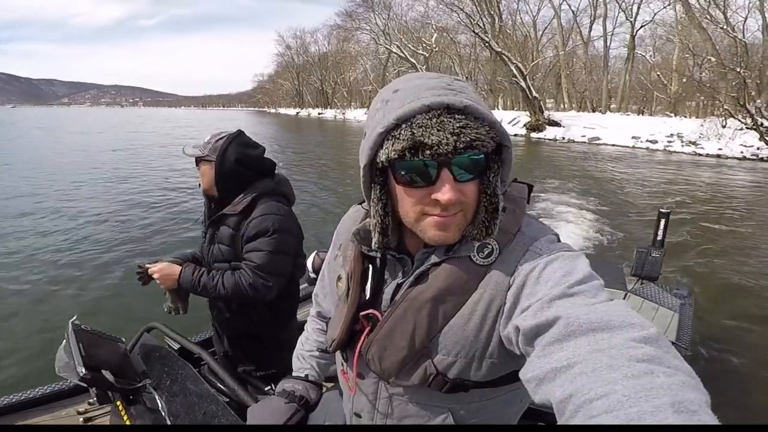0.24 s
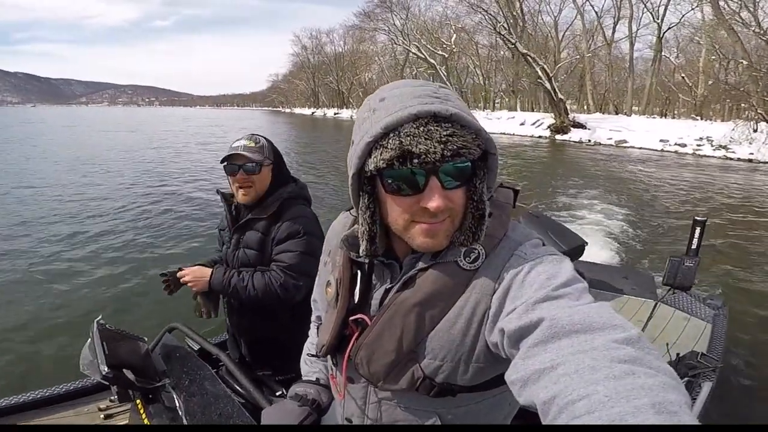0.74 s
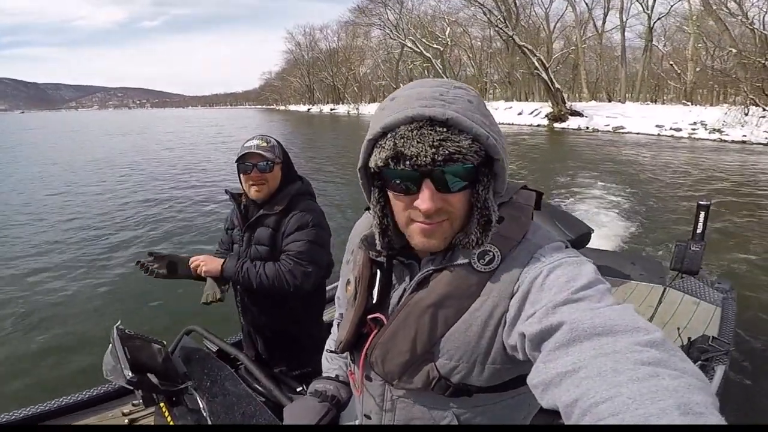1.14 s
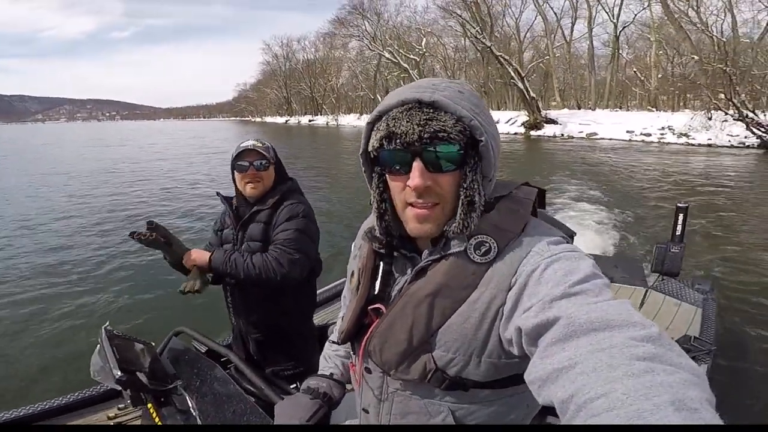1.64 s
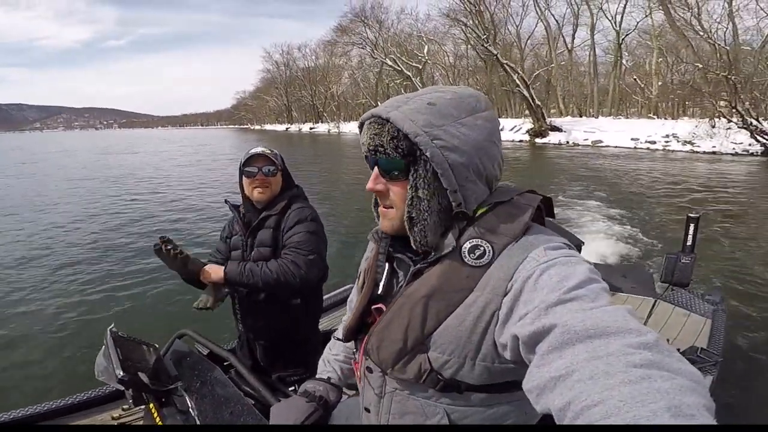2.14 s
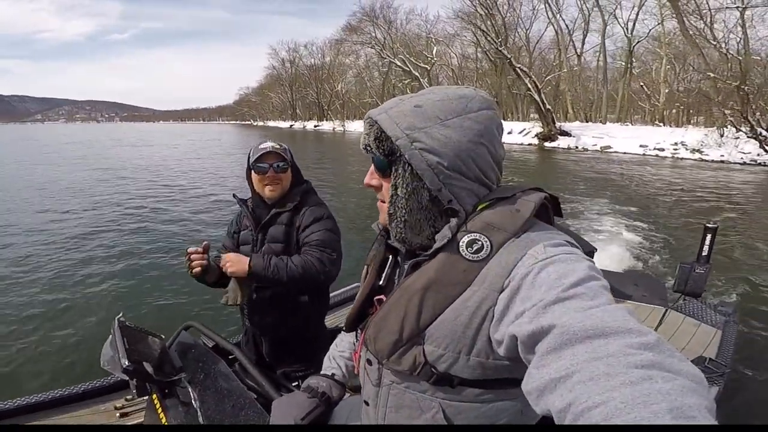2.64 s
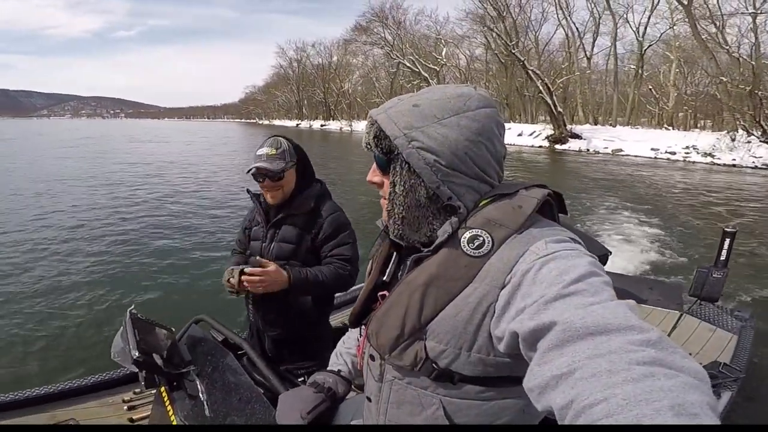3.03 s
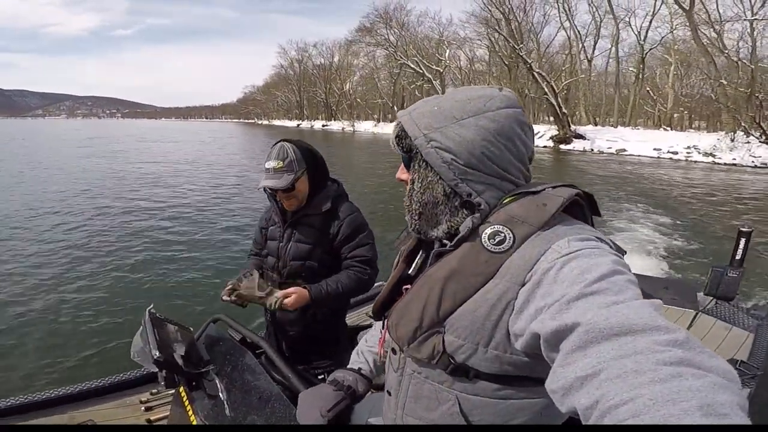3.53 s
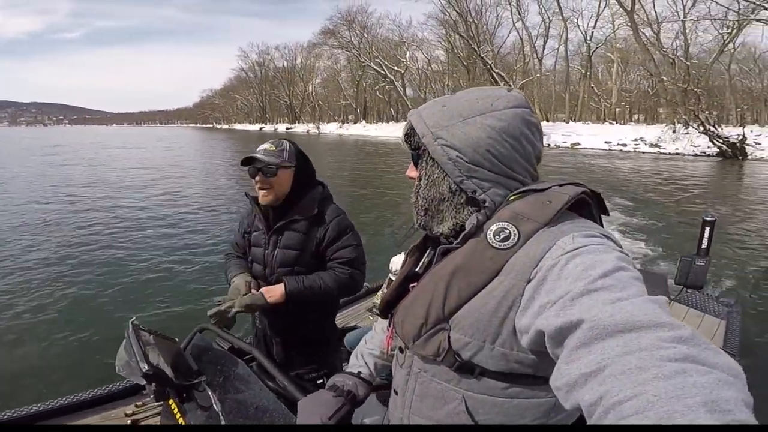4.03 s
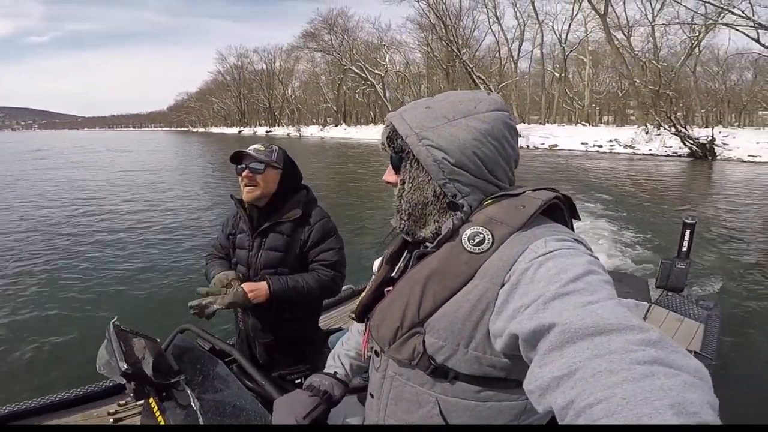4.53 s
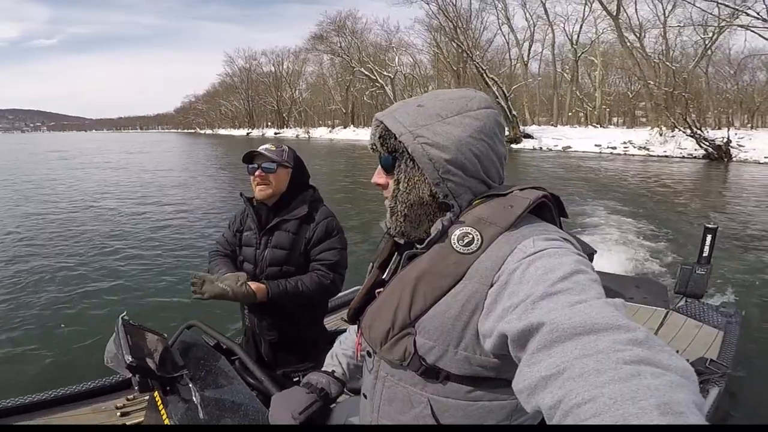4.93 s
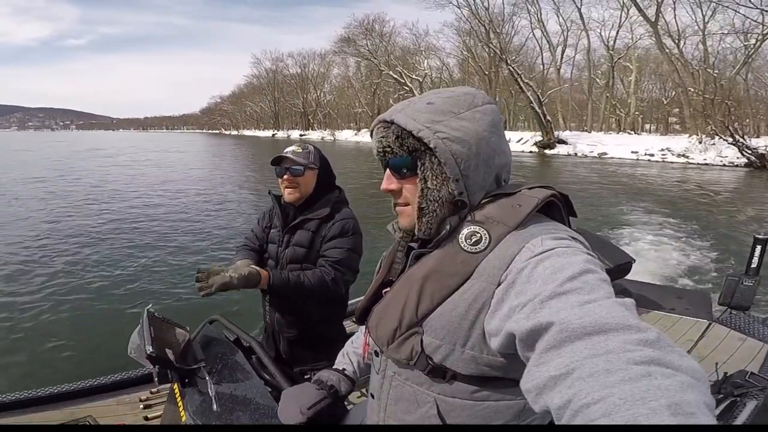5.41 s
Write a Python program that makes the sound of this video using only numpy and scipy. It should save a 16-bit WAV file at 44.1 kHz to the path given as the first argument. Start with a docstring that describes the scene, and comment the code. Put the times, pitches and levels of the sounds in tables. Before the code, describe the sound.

A motorboat cruises along a river, heard from the open deck. Its engine drones at a steady speed with an uneven low throb, over the rush of exhaust and wake and a light wind. A soft, deep bump comes about a second in. Later a faint metallic whine comes and goes, and near the end a jacket rustles briefly close to the microphone.

```python
"""On board an open jet boat cruising along a river, one microphone out in a light wind.
From the start the six-cylinder engine drones over the roar of exhaust and wake, pulling harder at
first; its firing note throbs as it beats with a boom a few hertz higher, and drive and panels whine
faintly. At 1.2 s comes one soft bump. From 2.2 s a gear sets one panel singing in stretches, and
from 5 s clothing rustles close to the microphone."""
import sys
import numpy as np
from scipy import signal
from scipy.fft import rfft, irfft, next_fast_len
from scipy.io import wavfile

SR = 44100
rng = np.random.default_rng(int(sys.argv[2]) if len(sys.argv) > 2 else 0)


def file_out(sig):
    """Save sig as 16-bit WAV at sys.argv[1]."""
    # one column per channel
    cols = np.atleast_2d(sig).T
    # limit, then scale
    lim = np.clip(cols, -1, 1)
    pcm = np.round(lim * 32767).astype(np.int16)
    wavfile.write(sys.argv[1], SR, pcm)


N = 250047
TIME = np.arange(N) / SR
CYLINDERS = 6


# engine speed under way: t/s, rate/(full engine cycles per s)
ENGINE_SPEED = [(0.0, 25.63), (0.36, 27.01), (0.52, 27.0), (0.64, 26.79), (0.8, 27.38), (0.98, 26.62),
                (1.12, 26.67), (1.35, 26.78), (1.5, 27.24), (1.69, 26.58), (1.87, 27.53), (2.03, 26.83),
                (2.27, 27.56), (2.44, 26.78), (2.56, 27.31), (2.75, 27.51), (2.88, 27.0), (3.02, 27.31),
                (3.15, 26.95), (3.3, 27.24), (3.62, 27.0), (3.87, 27.26), (4.13, 27.01), (4.42, 27.53),
                (4.68, 26.79), (4.82, 27.09), (4.95, 26.99), (5.14, 27.48), (5.31, 27.25), (5.67, 27.75)]
def crankshaft(first_chug_s):
    """Engine cycles counted from the first chug; everything that turns on board follows them."""
    turns = np.cumsum(in_time(ENGINE_SPEED)[0]) / SR
    return turns - np.interp(first_chug_s, TIME, turns)


# throbs of the drone, where firing note and boom fall into step: t/s, level/dB
THROBS = [(.03, -26.5), (.18, -30), (.35, -23.5), (.5, -24.5), (.67, -22.5), (.83, -23.5), (1.0, -23),
          (1.12, -24.5), (1.24, -20), (1.35, -26.5), (1.48, -23.5), (1.6, -19.5), (1.73, -25.5),
          (1.87, -22), (2.01, -21.5), (2.14, -21), (2.26, -22), (2.42, -23.5), (2.52, -21), (2.64, -21),
          (2.78, -21), (2.9, -24.5), (3.02, -21), (3.22, -27), (3.35, -24.5), (3.51, -24), (3.62, -24.5),
          (3.79, -21.5), (3.95, -25), (4.11, -26), (4.25, -21.5), (4.41, -29), (4.54, -28), (4.69, -24.5),
          (4.79, -25.5), (4.95, -28.5), (5.09, -26.5), (5.31, -29), (5.44, -40), (5.61, -26)]
# the boom's part in the drone, throbbing deepest at a half: t/s, share/(0-1)
BOOM_SHARE = [(0, .27), (.75, .2), (.9, .44), (1.05, .28), (1.3, .46), (1.55, .5), (1.8, .44), (2.08, .48),
              (2.2, .25), (2.33, .5), (2.58, .42), (2.72, .48), (3.1, .5), (3.3, .36), (3.7, .28),
              (3.9, .36), (4.05, .25), (4.2, .46), (4.9, .48), (5.67, .4)]
def firing_note(turns, boom_wander, flutter_db):
    """The firing note and a boom just above it drift in and out of step, throbbing as they meet."""
    share = in_time(BOOM_SHARE)[0]
    note = line(turns, order=CYLINDERS, start=0, wander=0, flutter_db=flutter_db)
    boom = line(CYLINDERS * turns + beats(), order=1, start=0, wander=boom_wander, flutter_db=flutter_db)
    return from_db(in_time(THROBS)[0]) * ((1 - share) * note + share * boom)


def beats():
    """Cycles the boom has gained on the firing note: one a throb."""
    return np.interp(TIME, np.array(THROBS)[:, 0], np.arange(len(THROBS)))


def surge(swing_db):
    """Gain that lifts and drops the chug with each throb of the firing note."""
    depth = 2 * in_time(BOOM_SHARE)[0]
    return from_db(swing_db * depth * np.cos(2 * np.pi * beats()))


# partials from unequal cylinders: f/cycle rate, base level at start/dB, base level at end/dB
ENGINE_ORDERS = [(1, -49, -43), (2, -45.5, -45.5), (3, -42, -41.5), (4, -34.5, -35), (5, -34.5, -34.5),
                 (7, -41.5, -36), (8, -41, -48.5), (9, -44, -52.5), (10, -41.5, -46), (11, -45, -37.5),
                 (12, -44.5, -44), (13, -35.5, -37), (14, -48.5, -46.5), (15, -56, -58), (16, -41, -43),
                 (18, -49, -48), (19, -47, -52.5), (21, -55, -53.5), (30, -57, -58.5), (33, -51, -65)]
# one overtone of the growl briefly stands out or sinks: f/cycle rate, mid t/s, half length/s, change/dB
SWELLS = [(11, .88, .2, 8), (11, 1.6, .1, 8), (11, 2.2, .1, 5), (11, 2.48, .05, 7), (11, 3.27, .06, 4),
          (11, 4.8, .1, 4), (13, .95, .13, -5), (13, 1.85, .05, -9), (13, 3.27, .06, -6),
          (13, 3.6, .08, -4), (13, 4.12, .06, -4), (13, 4.33, .04, 4), (13, 4.56, .1, -10),
          (13, 4.95, .08, -7), (13, 5.33, .04, -5), (12, .5, .28, 3), (18, .15, .12, 4), (18, .47, .07, 5),
          (18, 1.23, .17, 10), (18, 2.9, .08, 9), (18, 3.68, .25, 6), (18, 4.45, .25, 5)]
def engine(turns, spread, smear, wander_per_order, chug_flutter_db, growl_flutter_db, pull_db, pull_s):
    """Unequal cylinders chug once a cycle; the exhaust spreads the chug and smears its top to a growl."""
    out = np.zeros(N)
    for order, first_db, last_db in ENGINE_ORDERS:
        order = round(order)
        above_firing = order - CYLINDERS
        flutter_db = chug_flutter_db if above_firing < 0 else growl_flutter_db
        start = spread * above_firing ** 2 / 2 + smear * max(above_firing, 0) * rng.standard_normal()
        settling_db = np.linspace(first_db, last_db, N)
        # pulling harder at first lifts the overtones of the firing note
        lift_db = pull_db * np.exp(-TIME / pull_s) * (order % CYLINDERS == 0)
        swell_db = sum(db * np.exp(-((TIME - s) / half) ** 4) for k, s, half, db in SWELLS if k == order)
        partial = line(turns, order, start, wander_per_order * order, flutter_db)
        out += from_db(settling_db + lift_db + swell_db) * partial
    return out


def dip(at_s, half_s, change_db):
    """Gain that makes the drone dip briefly."""
    return from_db(change_db * np.exp(-((TIME - at_s) / half_s) ** 2))


# exhaust and hull roar as heard on board: f/Hz, relative level/dB
ROAR_SPECTRUM = [(30, -88), (70, -55.5), (120, -57.5), (180, -54.5), (225, -57.5), (260, -61), (315, -61.5),
                 (390, -60.5), (465, -60.5), (540, -68.5), (650, -69), (720, -69), (860, -73), (1150, -72),
                 (1480, -76), (2200, -86), (5000, -110)]
# strength of the flow: t/s, relative roar level/dB, relative spray level/dB
FLOW = [(0, -35.5, -54.5), (.8, -35.5, -52.5), (3, -35.5, -53), (5.1, -37, -53), (5.67, -36, -53)]
def roar(turns, gain_db):
    """Turbulent exhaust and jet, coloured by the hull."""
    rush = rng.standard_normal(N) * pulsing(turns, cycle_depth=0.077, firing_depth=0.051)
    return from_db(in_time(FLOW)[0] + gain_db) * coloured(rush, ROAR_SPECTRUM)


def pulsing(turns, cycle_depth, firing_depth):
    """Gas and water leave in spurts: once a firing, uneven over the cycle."""
    lope = np.cos(2 * np.pi * turns) + np.cos(2 * np.pi * 2 * turns + 1)
    return 1 + cycle_depth * lope + firing_depth * np.cos(2 * np.pi * CYLINDERS * turns)


# wind right on the microphone: t/s, level/dB
BREEZE = [(0, -26), (2.5, -30), (3.8, -35.5), (4.65, -25.5), (5.05, -39.5), (5.67, -25)]
def wind(gust_db):
    """Slow eddies press on the microphone."""
    eddies = rms_one(band(rng.standard_normal(N + SR), 6.2, 14.7)[SR:])
    return from_db(in_time(BREEZE)[0] + gust_db * drift(3.8)) * eddies


def bump(at_s, hz, t60_s, level_db):
    """A soft, deep knock close by that dies within a few cycles."""
    age = np.maximum(TIME - at_s, 0)
    return from_db(level_db - 60 * age / t60_s) * -np.sin(2 * np.pi * hz * age)


# pump and belt-driven parts, out of step with the firings: f/drive rate, relative level/dB
DRIVE_ORDERS = [(16, -47.5), (17, -51.5), (21, -55), (22, -51.5), (23, -50), (24, -54.5), (26, -55),
                (27, -50), (28, -52.5)]
def drive(turns, turns_per_cycle, gain_db):
    """Pump and pulleys whine, turning a little slower than the engine's cycle."""
    shaft = turns_per_cycle * turns
    return sum(from_db(db + gain_db) * line(shaft, round(k), rng.random(), wander=0.21, flutter_db=2.0)
               for k, db in DRIVE_ORDERS)


def clatter(turns, scatter_db, wander, gear_teeth, gear_db):
    """Valves and gears rattle alike every cycle: a comb of uneven partials, one gear standing out."""
    orders = np.arange(32, 80)
    gains = from_db(scatter_db * rng.standard_normal(len(orders)) + gear_db * (orders == gear_teeth))
    comb = sum(g * line(turns, k, rng.random(), wander, flutter_db=4.0) for k, g in zip(orders, gains))
    return rms_one(comb)


# pitches of the boat's thin metal panels: f/Hz
PANEL_HZ = [907, 930, 1008, 1041, 1262, 1335, 1446, 1560, 1738, 1865, 2105]
# the resonance at each of those pitches: width/Hz, relative level/dB
PANEL_RINGS = [(9, -8), (10, -11), (9, 3.5), (13, -1.5), (20, -3), (13.8, -1), (30, -0.8), (12, -10),
               (16, -7.5), (16, -13), (22, -11.5)]
# how freely the panels buzz: t/s, relative level/dB
BUZZ = [(0, -2.5), (1.2, -0.5), (1.95, -3.5), (2.3, 1.5), (2.7, 1), (3.1, 1), (3.5, 2), (3.85, 1.5),
        (4.45, -1), (4.8, 2), (5.67, 1.5)]
def panels(rattle, rush_db, gain_db):
    """A panel sings when a partial of the rattle lands on its pitch; rushing water roughens the note."""
    shake = rattle + from_db(rush_db) * noise_band(1210, 2200)
    rings = sum(from_db(db) * signal.lfilter(*signal.iirpeak(hz, hz / width_hz, fs=SR), shake)
                for hz, (width_hz, db) in zip(PANEL_HZ, PANEL_RINGS))
    return from_db(gain_db + in_time(BUZZ)[0]) * rings


# stretches in which the gear sets one panel singing: t/s, length/s, level/dB
WHINES = [(2.17, .25, -52), (2.52, .4, -49.5), (3.22, .26, -53), (3.75, .26, -49), (4.16, .46, -47.5),
          (5.03, .6, -52)]
def panel_whine(turns, hz, wander, flutter_db):
    """One panel sings at its own pitch, roughened by every chug."""
    note = line(hz * TIME, order=1, start=0, wander=wander, flutter_db=flutter_db)
    rough = pulsing(turns, cycle_depth=0.26, firing_depth=0.1) * from_db(flutter_db * drift(40))
    return strokes(WHINES, edge_s=0.044) * rms_one(note * rough)


# a breathy ring that swells, fades and creeps back: t/s, level/dB
RING = [(0, -51), (0.8, -43.5), (1.6, -49.5), (2.4, -59), (5.67, -48)]
def breathy_ring(hz, width_hz):
    """Rushing flow excites one narrow resonance."""
    return from_db(in_time(RING)[0]) * noise_band(hz - width_hz / 2, hz + width_hz / 2)


# spray of the wake, farther off astern: f/Hz, relative level/dB
SPRAY_SPECTRUM = [(1000, -95.5), (2200, -84.5), (3000, -82.5), (3450, -86.5), (3800, -90.5), (5000, -93),
                  (7000, -99), (8500, -96), (10000, -103.5), (11400, -104), (12500, -111), (15000, -117)]
def spray(turns, grain_db, gain_db):
    """Countless droplets merge into a hiss behind the stern."""
    drops = rng.standard_normal(N) * from_db(grain_db * drift(200))
    drops *= pulsing(turns, cycle_depth=0.017, firing_depth=.02)
    return from_db(in_time(FLOW)[1] + gain_db) * coloured(drops, SPRAY_SPECTRUM)


# echoes off deck and sides, within a few metres of the microphone: delay/s, gain/ratio
DECK_ECHOES = [(.0043, .1), (.0079, -.13), (.0137, .1)]
def deck(hiss):
    """Near reflections ripple the spectrum of the hiss and make it slightly tinny."""
    return hiss + sum(gain * np.interp(TIME - delay, TIME, hiss, left=0) for delay, gain in DECK_ECHOES)


# a sleeve slides close to the microphone: t/s, length/s, level/dB
RUBS = [(5.0, 0.88, -63), (5.307, 0.145, -64), (5.46, 0.34, -67)]
# colour of the sliding cloth: f/Hz, relative level/dB
CLOTH_SPECTRUM = [(2000, -13), (5000, 4), (8500, 0), (14500, -14)]
# creases snapping: t/s, relative peak level/dB
CREASES = [(5.330, -42), (5.376, -44), (5.404, -49), (5.415, -45), (5.440, -49), (5.494, -47), (5.545, -48)]
def clothing(grain_db, snap_t60_s, snap_gain_db):
    """Fabric slides in clumps of tiny slips, and a few creases snap."""
    slips = rng.standard_normal(N) * from_db(grain_db * drift(120))
    slide = coloured(slips, CLOTH_SPECTRUM) * strokes(RUBS, edge_s=0.025)
    snaps = sum((TIME >= s) * from_db(db + snap_gain_db - 60 * np.clip((TIME - s) / snap_t60_s, 0, 2))
                for s, db in CREASES)
    return slide + band(snaps * rng.standard_normal(N), 4200, 15000)


# valve ticks, faint under the drone: position/cycle, peak level/dB
TICKS = [(.11, -56), (.30, -55), (.80, -58)]
def valves(turns, t60_cycles, low_hz, high_hz):
    """Valves give short bright ticks at the same points of every cycle."""
    ticks = sum(from_db(db - 60 * ((turns - at) % 1) / t60_cycles) for at, db in TICKS)
    return ticks * noise_band(low_hz, high_hz)


def line(turns, order, start, wander, flutter_db):
    """One partial from phase `start` (cycles), wavering in phase (`wander`, rad) and level; rms 1."""
    phase = 2 * np.pi * (order * turns + start) + wander * drift(3.5)
    return rms_one(np.cos(phase) * from_db(flutter_db * drift(6.6)))


def drift(rate_hz):
    """Smooth random wavering, mostly slower than rate_hz; rms 1."""
    hop, run_in = 40, 2000
    pole = np.exp(-2 * np.pi * rate_hz * hop / SR)
    noise = rng.standard_normal(N // hop + run_in + 2)
    slow = signal.lfilter([1], [1, -2 * pole, pole * pole], noise)[run_in:]
    return np.interp(np.arange(N) / hop, np.arange(len(slow)), rms_one(slow))


def coloured(x, spectrum):
    """Give a steady sound a spectrum; rms 1."""
    size = next_fast_len(N)
    hz, db = np.transpose(spectrum)
    bin_hz = np.maximum(np.arange(size // 2 + 1) * SR / size, 1)
    gain = from_db(np.interp(np.log(bin_hz), np.log(hz), db))
    return rms_one(irfft(rfft(x, size) * gain, size)[:N])


def band(x, low_hz, high_hz):
    """Butterworth band-pass."""
    return signal.sosfilt(signal.butter(2, [low_hz, high_hz], "band", fs=SR, output="sos"), x)


def noise_band(low_hz, high_hz):
    """Band-passed noise; rms 1."""
    return rms_one(band(rng.standard_normal(N), low_hz, high_hz))


def strokes(rows, edge_s):
    """Gain of a row of held sounds, each fading in and out."""
    return sum(from_db(db) * np.clip(np.minimum(TIME - s, s + length - TIME) / edge_s, 0, 1)
               for s, length, db in rows)


def in_time(rows):
    """Each column of a curve at every sample."""
    s, *columns = np.transpose(rows)
    return [np.interp(TIME, s, column) for column in columns]


def from_db(db):
    """Decibels to gain."""
    return 10 ** (np.asarray(db) / 20)


def rms_one(x):
    """Scale to unit rms."""
    return x / np.sqrt(np.mean(x ** 2) + 1e-20)


def scene():
    """Drone, machinery, water and close sounds meet at one microphone on board."""
    turns = crankshaft(first_chug_s=.029)
    drone = firing_note(turns, boom_wander=0.1, flutter_db=1.3)
    chug = engine(turns, spread=-.16, smear=0.197, wander_per_order=0.021,
                  chug_flutter_db=1.0, growl_flutter_db=2.0, pull_db=8.5, pull_s=1.6)
    drone += surge(swing_db=1.6) * chug
    drone *= dip(at_s=2.315, half_s=.03, change_db=-7)
    rattle = clatter(turns, scatter_db=1.5, wander=0.12, gear_teeth=38, gear_db=4.5)
    machinery = from_db(-48.0) * coloured(rattle, ROAR_SPECTRUM)
    machinery += panels(rattle, rush_db=-4, gain_db=-38.5)
    machinery += drive(turns, turns_per_cycle=.985, gain_db=2.0)
    machinery += panel_whine(turns, hz=1038, wander=0.82, flutter_db=5.5)
    machinery += valves(turns, t60_cycles=0.37, low_hz=1800, high_hz=4200)
    water = roar(turns, gain_db=5.0) + breathy_ring(hz=1180, width_hz=117)
    water += deck(spray(turns, grain_db=0.95, gain_db=1.6))
    nearby = wind(gust_db=0.3) + bump(at_s=1.186, hz=43, t60_s=0.078, level_db=-11.5)
    nearby += clothing(grain_db=2.0, snap_t60_s=.015, snap_gain_db=-2.5)
    return (drone + machinery + water + nearby)[None]


def record(dry):
    """The microphone's signal is eased over 4 ms at each end and cut steeply above 15.1 kHz."""
    ease = np.clip(np.minimum(TIME, TIME[-1] - TIME) / .004, 0, 1)
    return signal.sosfilt(signal.ellip(10, .2, 90, 15100, fs=SR, output="sos"), dry * ease)


dry = scene()
out = record(dry)
file_out(out)
```